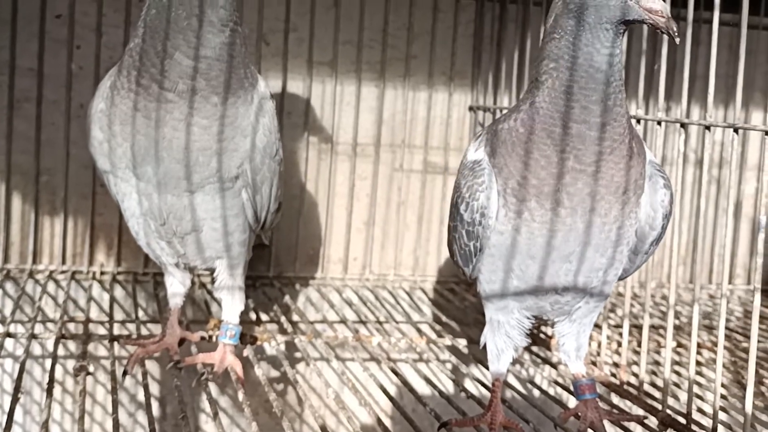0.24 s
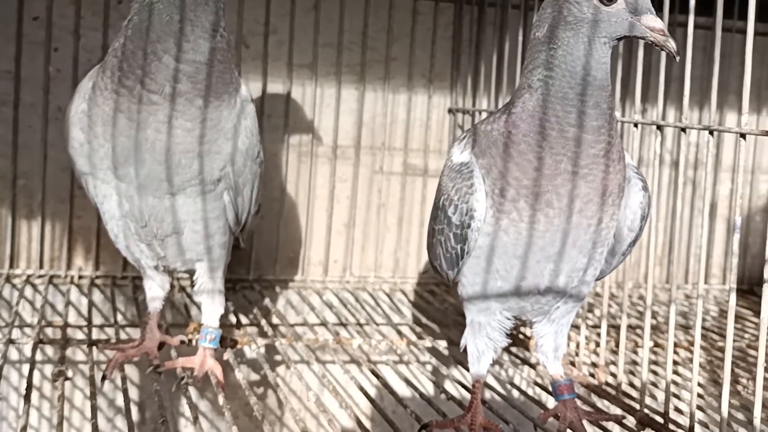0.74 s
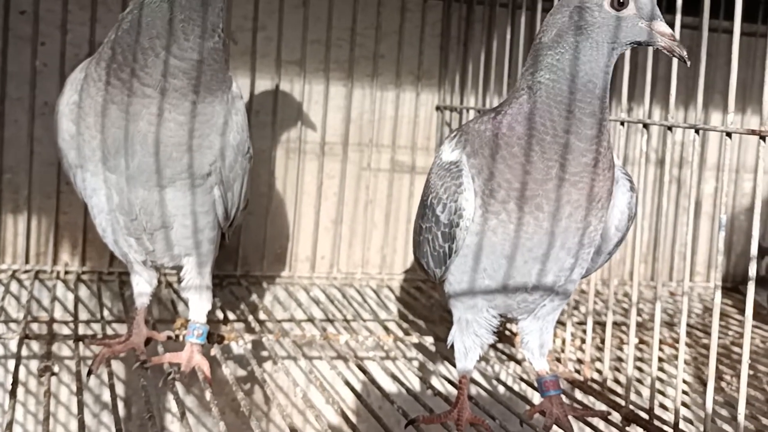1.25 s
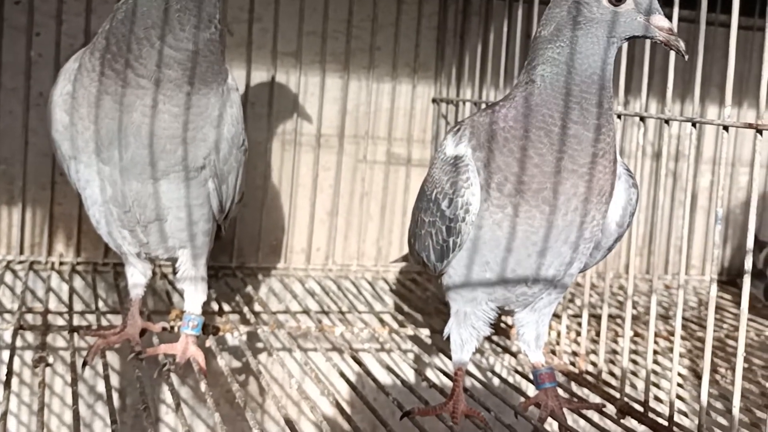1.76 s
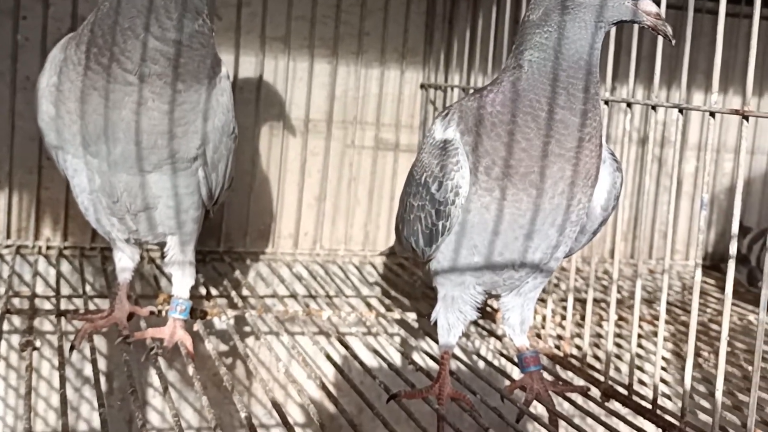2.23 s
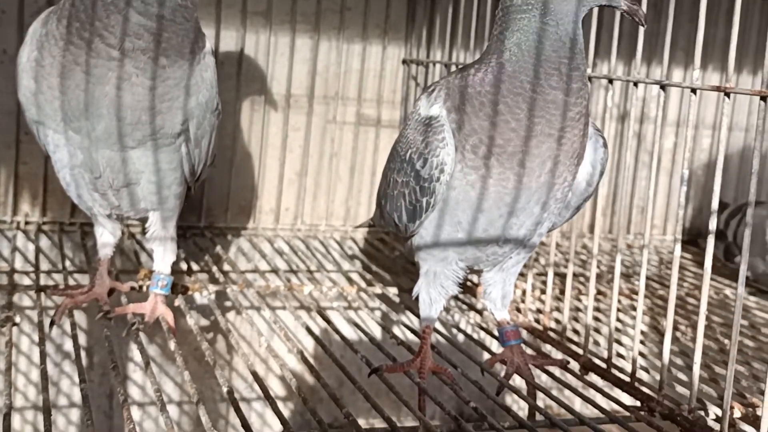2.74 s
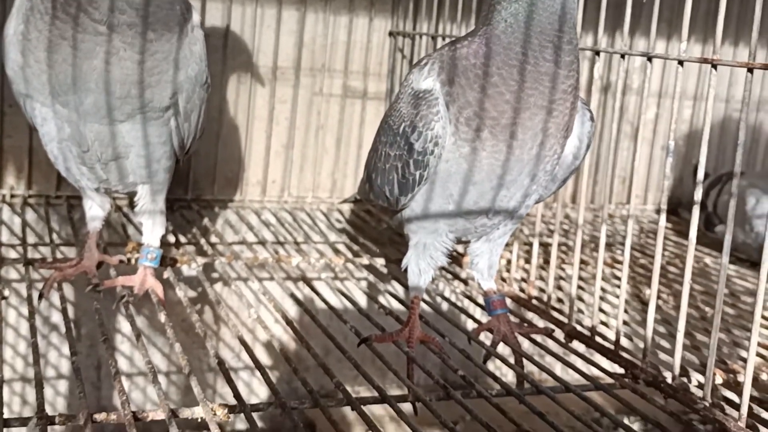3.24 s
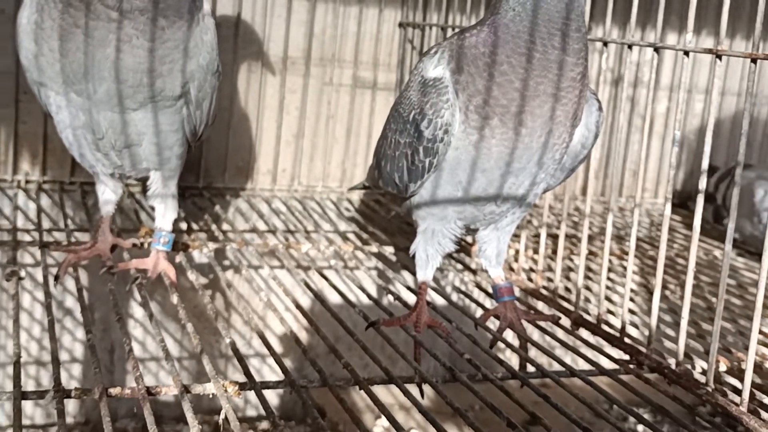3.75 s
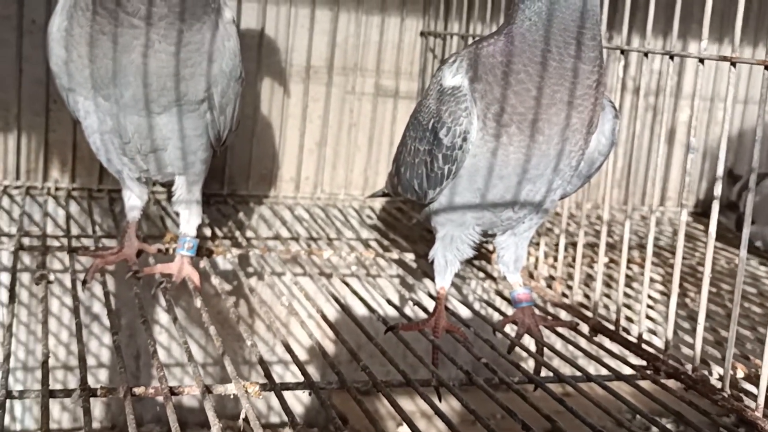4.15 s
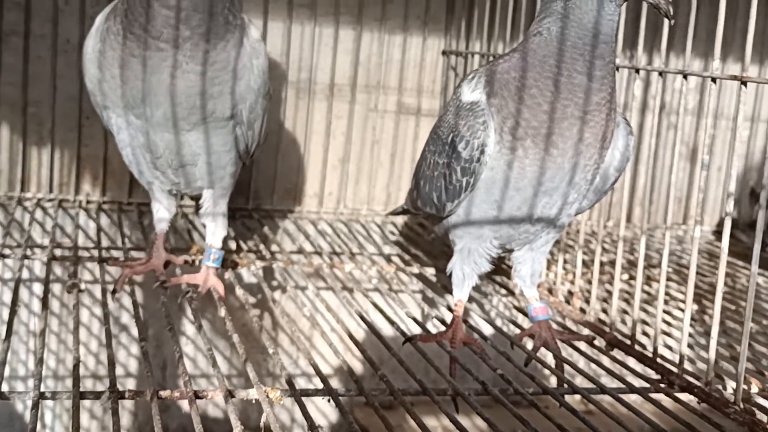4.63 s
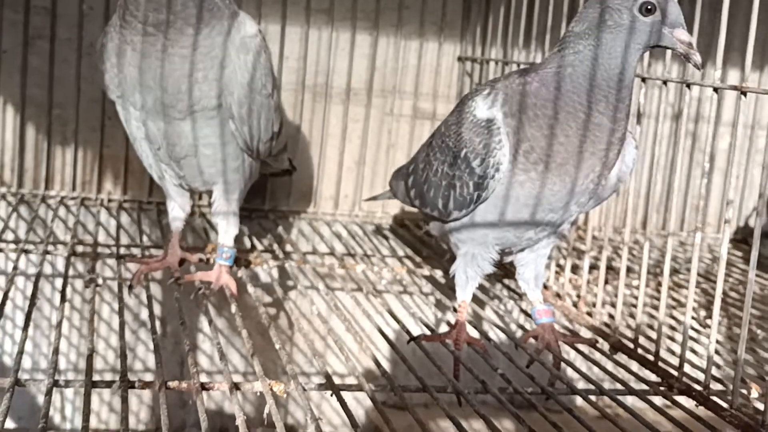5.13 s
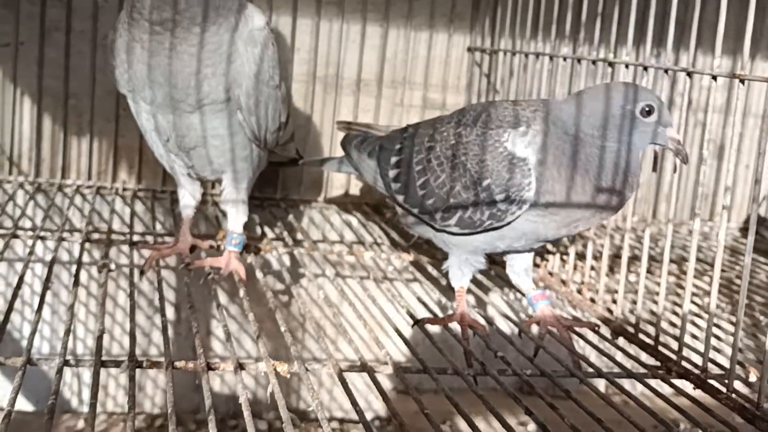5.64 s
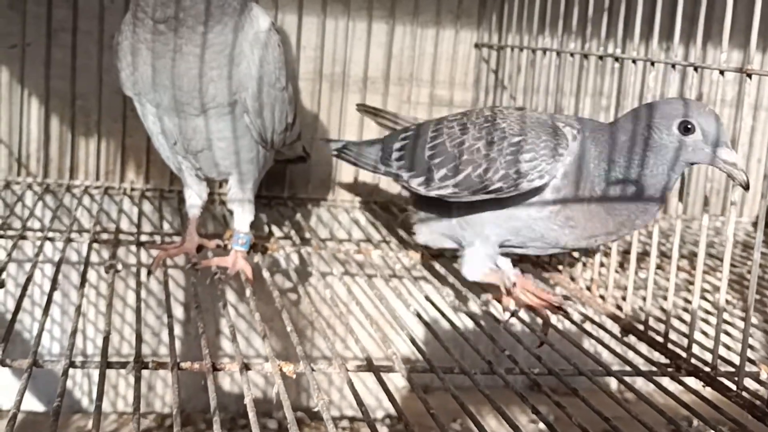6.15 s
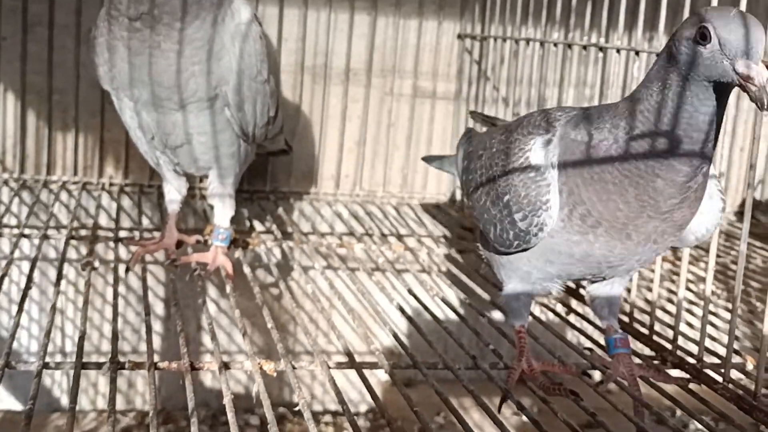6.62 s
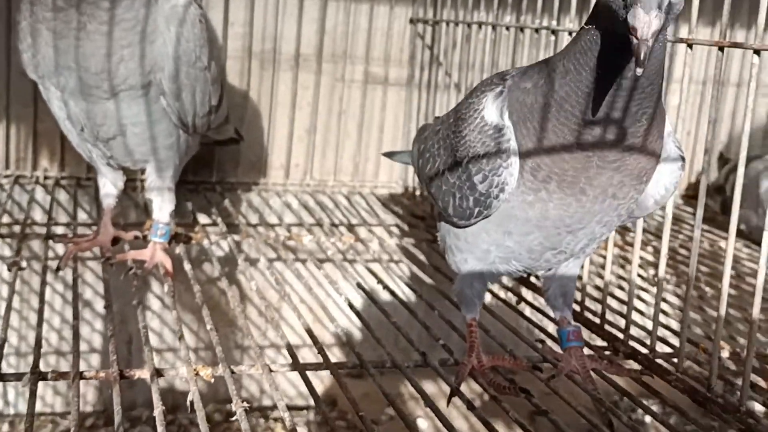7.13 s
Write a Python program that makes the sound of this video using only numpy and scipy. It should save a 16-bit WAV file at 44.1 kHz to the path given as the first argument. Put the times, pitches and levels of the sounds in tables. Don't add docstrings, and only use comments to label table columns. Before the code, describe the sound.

Close stereo microphones in a pigeon loft, with low distant street rumble, faint hiss and a blurred murmur of cooing. From 0 s a vigorous flurry fills the foreground: sharp wing claps, broad feather swishes, dry quill snaps, low puffs of air, thumps and knocks on the cage, and wires pinging briefly around 0.3-0.7 s. It thins after 1.2 s, with short coo notes and thin whistles appearing near 1 s. Around 1.9-2.8 s young birds give hoarse high squeaks and squeals over small steps and rustles. From about 3 to 5.2 s soft throbbing coos return among isolated wing flicks and a few more squeaks. A second, shorter flurry breaks out at 5.2-5.6 s, with claps, gusts and dull landings. Afterwards only light rustling and scattered crisp flicks remain, and a faint raspy squeal rises near 7 s before the end at about 7.4 s.

```python
import sys
import numpy as np
from scipy import signal
from scipy.fft import rfft, irfft
from scipy.io import wavfile
from scipy.ndimage import uniform_filter1d

SR = 44100
rng = np.random.default_rng(int(sys.argv[2]) if len(sys.argv) > 2 else 0)


def wav_out(sig):
    wavfile.write(sys.argv[1], SR, np.round(np.clip(np.atleast_2d(sig).T, -1, 1) * 32767).astype(np.int16))


def elevation(decibels):
    levels = np.asarray(decibels, float)
    return 10 ** (levels / 20)


N = 325458
T = np.arange(N) / SR
HZ = np.arange(N // 2 + 1) * SR / N + 1e-3

# f/Hz, level/dB per Hz
LOFT_COLOUR = [(15, -16), (25, -1.5), (59, 1), (112, -10.5), (184, -1.5), (406, -14.5), (876, -22.5),
               (996, -16), (2000, -42), (2600, -66), (4400, -120)]
HISS_COLOUR = [(1500, -13), (2000, -13), (2500, -5.5), (4000, -1.5), (5000, -8.5), (6200, 4), (7500, -13),
               (8700, 3.5), (9800, -10), (12000, -17), (14500, -18), (16000, -20)]
FLOCK_COLOUR = [(400, -8.0), (480, -6.0), (540, -2.0), (600, -10.0), (680, -13.5)]
DRAUGHT_COLOUR = [(12, -34), (25, -1.5), (60, 0.5), (90, 1.5), (140, -32)]
GUST_COLOUR = [(12, -42), (22, -4), (33, 3), (50, -7), (80, -19), (130, -31)]
FEATHER_COLOUR = [(530, -58), (900, -8), (1190, -8.5), (1670, -11), (2810, -1), (3930, 1), (5000, -3.5),
                  (5720, -2), (9000, -11.5), (11700, -58), (19800, -120)]
SHEEN_COLOUR = [(3530, -13.5), (6000, -1.5), (9880, -0.5), (10800, -1), (13200, -2.5), (15600, -5),
                (16000, -41), (16300, -45)]
BODY_COLOUR = [(53, -43), (90, -15.5), (139, -2), (178, 2), (344, -9), (539, -2), (698, -10), (833, -9.5),
               (926, -11.5), (1240, -13), (1500, -15.5), (1950, -30.5), (3300, -120)]
QUILL_COLOUR = [(2000, -34), (4000, -15), (7500, 3.5), (11000, 2.5), (14500, -2), (16400, -1), (16600, -50)]

# t/s, level/dB
FLOCK_LEVEL = [(0, -49), (.47, -45.5), (1.0, -51), (1.5, -59.5), (2.5, -66.5), (3.0, -58.5), (3.5, -60.5),
               (4.07, -56.5), (4.8, -57), (5.3, -72), (5.7, -60), (6.15, -70), (6.45, -62.5), (7.38, -69)]
# t/s, level/dB
DRAUGHT_LEVEL = [
    (0, -57.5),
    (1.3, -57),
    (2.0, -57.5),
    (2.6, -61.5),
    (3.2, -57.5),
    (3.8, -63.5),
    (4.4, -67),
    (5.6, -71),
    (6.5, -68),
    (7.38, -66),
]
# t/s, peak level/dB
GUSTS = [(.02, -44.5), (.11, -46), (.215, -33.5), (.325, -29.5), (.435, -35), (.545, -32.5), (.655, -28.5),
         (.75, -30), (.86, -41), (.97, -49), (1.1, -47), (1.22, -39), (5.21, -35.5), (5.285, -41),
         (5.41, -40), (5.49, -38), (5.63, -46)]
# t/s, feather level/dB, floor-shaking feet level/dB
BUSTLE = [(0, -44, -45.5), (.15, -45, -51), (.4, -36, -39.5), (.65, -44, -40.5), (1.15, -44, -48),
          (1.5, -48, -51), (1.8, -52, -57), (2.3, -51, -55.5), (2.85, -57.5, -58.5), (3.5, -58.5, -58),
          (3.75, -50, -47.5), (4.2, -52.5, -53.5), (4.6, -45.5, -50.5), (4.95, -51, -49.5), (5.4, -42, -41),
          (5.65, -48.5, -49.5), (6.5, -49.5, -55.5), (7.38, -54.5, -64.5)]
# t/s, peak level/dB, sheen above 7 kHz level/dB, body under 1 kHz level/dB
FLURRY = [(0.0494, -22.5, -2, -3.5), (0.1484, -31, 3, -13), (0.167, -22, -3, -7), (0.216, -27.5, -1, -21),
          (0.258, -32.5, 2, -1), (.3475, -35, 5.5, -1), (0.502, -15.5, -2.5, -6.5), (0.553, -33, 3, -24),
          (.6194, -29, -8, 0), (0.284, -28, -2, -2.5), (0.506, -28, -11, -10), (0.6555, -40, -6, -12),
          (.4414, -38, 2, -20), (0.859, -32.5, -0.5, -13), (0.953, -26, -1.5, -4), (0.979, -27, 2.5, -21),
          (1.1544, -39, 4, -32), (1.175, -39, -3, -14), (1.2062, -29.5, 1, -5), (1.3433, -40, -0.5, 1),
          (1.384, -36, 3, -6), (1.437, -43, 9.5, -21), (1.487, -32, -4, -5), (1.5494, -53, 7, -11),
          (1.638, -33, -4, -3), (1.6994, -44, -3, -14), (1.7945, -34.5, -4, -10), (1.856, -38, -2, -8),
          (1.923, -37.5, -0.5, -9), (2.027, -47, 6, -2)]
# t/s, peak level/dB, sheen level/dB, body level/dB
FLICKS = [(2.297, -49.5, 2, -1), (2.406, -38, 4.5, -9), (2.467, -43, -2, -0.5), (2.761, -44.5, 1.5, -19),
          (3.085, -39.5, 3.5, -27), (3.356, -38.5, -3, -12), (3.6064, -39.5, -2.5, -24),
          (3.799, -35.5, -3, -14), (3.9699, -43, -6, -15), (4.076, -41, 1.5, -6), (4.436, -59, 13, -1),
          (4.788, -34, -6, -25), (3.855, -42.5, -3, -12), (4.595, -53, 8, -12), (5.111, -40.5, 2.5, -10),
          (5.065, -36, -5, 0.5), (5.172, -48, -6, -4), (4.9715, -46, 0, -8), (5.396, -29.5, -4, -10),
          (5.2586, -28, -4, -7), (5.3448, -38, -2, -11), (5.368, -25.5, -6.5, -5.5), (5.468, -28, 5, -6),
          (5.478, -29.5, 2, -11), (5.587, -36.5, -3, 2), (5.729, -40.5, 3, -16), (6.0455, -38, 8.5, -29),
          (6.348, -34.5, 0, -4.5), (6.568, -40.5, -3, -8), (6.643, -34, 7, -7), (6.796, -47.5, 12.5, 2.5)]
# crest t/s, peak level/dB, sheen level/dB, body level/dB, rise/s
SWISHES = [(0.043, -23, -5, -21, 0.0018), (0.44, -28, -1.5, -20, 0.0066), (0.603, -28.5, 1, -9, 0.0047),
           (0.652, -15, -1.1, -17, 0.0018), (0.768, -31, -2, 0, 0.012), (3.64, -40, -5, -32, 0.011),
           (4.328, -40, 6.5, -20, 0.0057), (4.347, -40.5, 7, -22, 0.0029), (4.482, -42.5, -2, -10, 0.01),
           (4.98, -41, -0.5, -1, 0.0055), (5.2, -36.5, -2, 0.5, 0.0078), (5.281, -32.5, -3, -5, 0.0031),
           (5.409, -28, -2, -2, 0.0062), (5.491, -34, 1, -3.5, 0.0086), (5.776, -35, -5.5, -6, 0.0081),
           (1.08, -25, 0.5, -3.5, 0.0016), (6.499, -32.5, 5.5, -15.5, 0.003), (6.3, -60, 14, -23, 0.02),
           (7.01, -46, -1, -30, 0.012)]
# t/s, peak level/dB, fall/s
SNAPS = [(0.049, -19, 0.002), (0.1496, -22, 0.002), (0.167, -18, 0.002), (0.2179, -21, 0.002),
         (0.2603, -30, 0.002), (0.3485, -27, 0.002), (0.4414, -22, 0.002), (0.5015, -14, 0.002),
         (0.6, -26, 0.002), (0.6484, -12, 0.0022), (0.7669, -26, 0.002), (0.804, -27, 0.0022),
         (0.9514, -26, 0.002), (0.9787, -25, 0.002), (1.0782, -14, 0.002), (1.1543, -28, 0.002),
         (1.176, -27, 0.0023), (1.2085, -23, 0.002), (1.3433, -34, 0.002), (1.3833, -27, 0.002),
         (1.4376, -29, 0.002), (1.6387, -34, 0.002), (1.7948, -35, 0.002), (1.8534, -32, 0.002),
         (1.8585, -26, 0.002), (1.924, -35, 0.002), (2.0257, -35, 0.002), (2.408, -27, 0.002),
         (2.7591, -43, 0.002), (3.0844, -29, 0.002), (3.3543, -34, 0.002), (3.6042, -37, 0.002),
         (3.7958, -37, 0.002), (4.0761, -35, 0.002), (4.3241, -25, 0.002), (4.4368, -29, 0.0022),
         (4.788, -37, 0.002), (5.1696, -40, 0.002), (5.2584, -30, 0.002), (5.3448, -32, 0.002),
         (5.3687, -28, 0.002), (5.3991, -24, 0.002), (5.469, -17, 0.002), (5.5474, -31, 0.002),
         (5.5862, -35, 0.002), (5.732, -33, 0.002), (6.0447, -27, 0.002), (6.348, -36, 0.0017),
         (6.4971, -29, 0.0018), (6.6435, -24, 0.002), (6.7955, -35, 0.002)]
# t/s, peak level/dB, f/Hz, ring/s
THUDS = [
    (0.162, -40, 172, 0.077),
    (0.275, -33, 154, 0.047),
    (0.501, -29, 175, 0.1),
    (0.595, -29.5, 154, 0.065),
    (1.068, -44, 181, 0.047),
    (5.194, -33, 230, 0.094),
    (5.278, -29.5, 243, 0.064),
    (5.391, -32, 191, 0.1),
    (5.496, -25, 136, 0.082),
]
# t/s, peak level/dB, f/Hz, ring/s
KNOCKS = [
    (.299, -18, 553, 0.01),
    (0.847, -25, 390, 0.022),
    (.884, -40, 504, .03),
    (2.084, -31, 398, 0.013),
    (2.229, -40, 393, 0.03),
    (2.339, -34.5, 420, 0.022),
    (2.452, -38.5, 444, .02),
    (2.803, -31, 424, 0.022),
    (4.801, -34.5, 534, 0.028),
]
# t/s, peak level/dB, f/Hz, ring/s
PINGS = [
    (0.309, -32, 740, 0.087),
    (0.416, -33.5, 830, 0.18),
    (0.627, -29.5, 834, 0.11),
    (0.715, -30.5, 691, 0.085),
]
# t/s, length/s, f/Hz, glide/Hz, level/dB
WHISTLES = [(0.972, 0.15, 2940, 2, -49.5), (1.159, 0.089, 2880, 60, -52), (1.18, 0.27, 3330, 30, -54),
            (1.376, 0.073, 3390, -3, -59), (1.536, 0.25, 2800, 8, -55), (1.8, 0.12, 3320, 0, -57),
            (2.232, 0.067, 2640, 0, -55), (2.3, 0.12, 2550, 0, -56), (3.115, .07, 3410, 0, -58),
            (3.191, 0.22, 3370, -17, -58.5), (3.36, 0.1, 3360, 0, -62), (2.98, .08, 2400, -3, -62),
            (6.825, 0.085, 2450, 450, -59)]
# t/s, length/s, f/Hz, glide/Hz, level/dB
SQUEAKS = [(1.9, 0.067, 3430, -100, -50), (1.865, 0.042, 2750, 500, -51), (1.9, .09, 3080, -120, -47.5),
           (1.959, 0.08, 2974, -200, -48.5), (1.934, 0.1, 2650, -120, -49), (2.07, 0.19, 2710, -42, -55.5),
           (2.187, 0.036, 2960, 350, -49), (2.204, 0.059, 3160, 40, -49), (2.186, 0.043, 2750, 60, -55),
           (2.326, 0.14, 3330, 14, -53), (2.34, 0.055, 4200, 40, -50), (2.381, 0.071, 3990, 150, -47.5),
           (2.411, 0.056, 3000, 150, -54), (2.422, 0.12, 2600, -60, -57.5), (2.56, 0.11, 2560, -56, -57.5),
           (2.701, 0.1, 2500, 0, -61), (2.829, 0.13, 2430, -34, -60), (2.779, .05, 3900, 0, -58),
           (3.156, 0.068, 3410, -35, -50.5), (3.63, 0.06, 3370, -60, -45.5), (3.779, 0.078, 3330, -7, -51),
           (3.805, 0.09, 3200, 2, -55), (3.963, 0.042, 3380, 0, -51), (5.906, 0.096, 3450, -2, -54.5)]
# t/s, length/s, f/Hz, glide/Hz, level/dB
SQUEALS = [
    (1.869, 0.22, 2936, -300, -50.5),
    (2.313, 0.162, 3920, -100, -51),
    (3.156, 0.055, 3900, 0, -55),
    (3.965, 0.068, 3920, -2, -50.5),
    (6.951, 0.39, 3350, 306, -57.5),
    (7.04, 0.14, 4020, -150, -54.5),
]
# t/s, length/s, f/Hz, fundamental level/dB, octave level/dB
COO = [(0.984, 0.042, 524, -41.5, -67), (1.157, 0.038, 532, -44.5, -80), (1.221, .035, 552, -44.5, -72),
       (2.85, 0.35, 522, -69, -91), (3.121, 0.098, 540, -56.5, -85), (3.19, 0.15, 488, -62, -62.5),
       (3.3, 0.15, 478, -54.5, -59), (3.39, 0.061, 480, -59, -61), (3.472, 0.11, 508, -50.5, -70),
       (3.54, 0.34, 511, -57.5, -80), (3.679, 0.072, 468, -57, -57), (3.728, 0.062, 482, -51.5, -60),
       (3.95, 0.067, 537, -71, -56), (4.031, 0.088, 542, -67, -52), (4.145, 0.063, 542, -65, -52),
       (4.246, 0.055, 530, -51, -55), (4.407, 0.067, 546, -57, -62), (4.53, 0.05, 510, -60, -59),
       (4.582, 0.031, 526, -55, -57), (4.8, 0.083, 518, -61, -57.5), (4.496, 0.057, 537, -78, -55),
       (4.66, 0.094, 542, -48.5, -53.5), (4.71, 0.072, 522, -63, -62), (4.899, 0.06, 471, -45, -52.5),
       (4.99, 0.095, 493, -52, -68), (5.029, 0.043, 503, -52, -59), (5.15, 0.11, 499, -50, -68)]

LOFT_DB, HISS_DB, HISS_LEFT_DB = -55.5, -55.5, 5
GUST_S = 0.025
CLAP_LATE_S, CLAP_HOLD_S = 0.00146, 0.0015
CLAP_RISE_S, CLAP_FALL_S = 0.0013, 0.0062
LOUD_DB, QUICKER_PER_DB = -24.5, 0.02
SHEEN_FALL_SHARE = 0.91
SWISH_FALL_SHARE = 1.9
LOFT_TAIL_DB, LOFT_TAIL_S = -26.5, 0.022
SHEEN_DB, SHEEN_SLOPE = -54, 0.72
SNAP_RISE_S, SNAP_DB = 0.0002, -3
SQUEAK_HOARSE_HZ, SQUEAL_HOARSE_HZ, WHISTLE_HOARSE_HZ = 230, 603, 65.3
COO_SAG_HZ = -13
ECHO_DB, ECHO_S = -13, 0.04


def colour(x, table):
    hz, db = np.transpose(table)
    gain = elevation(np.interp(np.log(HZ), np.log(hz), db, -99, -99))
    y = irfft(rfft(x) * gain, N)
    return y / np.sqrt(np.mean(y ** 2))


def smooth(x, size, axis=-1):
    return uniform_filter1d(uniform_filter1d(x, size, axis), size, axis)


def walk(rate_hz):
    k = int(SR / rate_hz)
    steps = np.repeat(rng.standard_normal(N // k + 1), k)
    return 1.72 * smooth(steps, k)[:N]


def grains(spread_db):
    size = elevation(spread_db * rng.exponential(size=N // 8 + 1))
    return rng.standard_normal(N) * np.repeat(size, 8)[:N]


def field(table, spread_db, like_hz, direct, lag_s):
    same = direct + (1 - direct) / (1 + (HZ / like_hz) ** 2)
    shared, left, right = (rfft(grains(spread_db)) for _ in range(3))
    late = shared * np.exp(-2j * np.pi * HZ * lag_s)
    pair = np.sqrt(same) * np.array([late, shared]) + np.sqrt(1 - same) * np.array([left, right])
    return colour(irfft(pair, N), table)


def curve(table, column):
    rows = np.array(table)
    return np.interp(T, rows[:, 0], rows[:, column])


def place(x, lag_s, pan_db):
    left = np.roll(x, int(lag_s * SR))
    return np.array([left * elevation(pan_db / 2), x * elevation(-pan_db / 2)])


def patchy(x, depth_db, bins, frames):
    _, _, z = signal.stft(x, nperseg=512)
    chance = uniform_filter1d(rng.standard_normal(z.shape[1:]), bins, axis=0)
    chance = uniform_filter1d(chance, frames, axis=1)
    gain = elevation(depth_db * chance / chance.std())
    gain = gain / np.sqrt(np.mean(gain ** 2))
    return signal.istft(z * gain, nperseg=512)[1][:, :N]


def note(s, length, hz, glide_hz, blur, blur_hz, arch=0.71):
    t = T[:int(length * SR)]
    k = int(SR / blur_hz)
    noise = rng.standard_normal((2, SR))[:, :len(t) + 2 * k]
    fuzz = smooth(noise, k)[:, :len(t)] * np.sqrt(0.29 * k)
    phase = 2 * np.pi * (hz * t + glide_hz * (t ** 2 / length - t) / 2)
    rough = 1 - blur + blur * (fuzz[0] + 1j * fuzz[1])
    wave = np.imag(rough * np.exp(1j * phase))
    out = np.zeros(N)
    start = int(s * SR)
    out[start:start + len(t)] = 2 * np.sin(np.pi * t / length) ** arch * wave
    return out


def loft():
    lean_db = np.array([[HISS_LEFT_DB], [-HISS_LEFT_DB]]) / 2
    hiss = elevation(HISS_DB + 0.11 * walk(3.9) + lean_db) * field(HISS_COLOUR, 0, 600, 0.034, 0.000273)
    rumble = elevation(LOFT_DB + 0.68 * walk(2.535)) * field(LOFT_COLOUR, 0, 380, 0.28, -0.00026)
    return rumble + hiss


def flock():
    level = elevation(curve(FLOCK_LEVEL, 1) + 0.86 * walk(12))
    return level * field(FLOCK_COLOUR, 0, 610, 0.17, -0.000028)


def air():
    puffs = sum(elevation(db) * np.exp(-((T - s) / GUST_S) ** 2 / 2) for s, db in GUSTS)
    gusts = puffs * field(GUST_COLOUR, 0, 800, 0.31, 0)
    return gusts + elevation(curve(DRAUGHT_LEVEL, 1)) * field(DRAUGHT_COLOUR, 0, 900, 0.44, 0)


def strokes():
    power = np.zeros((3, N))
    moves = []
    for s, db, sheen_db, body_db in FLURRY + FLICKS:
        rise = CLAP_RISE_S * (0.5 + QUICKER_PER_DB * (LOUD_DB - db))
        moves.append((s + CLAP_LATE_S, db, sheen_db, body_db, rise, CLAP_FALL_S))
    moves += [(*row, SWISH_FALL_SHARE * row[-1]) for row in SWISHES]
    for s, db, sheen_db, body_db, rise, fall in moves:
        span = slice(max(int((s - 10 * rise) * SR), 0), int(s * SR) + SR // 5)
        t = T[span] - s
        t = t - np.clip(t, 0, CLAP_HOLD_S)
        fall = fall * np.array([[1], [SHEEN_FALL_SHARE], [1]])
        decay = np.exp(-t / fall) + elevation(LOFT_TAIL_DB) * np.exp(-t / LOFT_TAIL_S)
        shape = decay / (1 + np.exp(-t / rise - t / fall * (t < 0)))
        peak_db = db - 3.5 + np.array([[0], [sheen_db], [body_db]])
        power[:, span] += elevation(2 * peak_db) * shape / shape.max(axis=1, keepdims=True)
    return power


def wings():
    flutter = 1.1 * walk(25)
    stir = curve(BUSTLE, 1)
    sheen_stir = SHEEN_DB + SHEEN_SLOPE * (stir + 50)
    feet = curve(BUSTLE, 2) + 1.12 * walk(15)
    rustle = elevation(2 * np.array([stir + flutter, sheen_stir + flutter, feet]))
    still = elevation(2 * np.array([[-57.5], [-60], [-58]]))
    power = strokes() + np.maximum(rustle - still, 0.25 * still)
    lean = elevation(np.array([[-1.5, -2.0], [3.5, -1.5], [-2.0, -2.0]]))[..., None]
    feather, sheen, body = lean * np.sqrt(power)[:, None]
    out = feather * field(FEATHER_COLOUR, 0.96, 1800, 0.02, -0.0004)
    out += sheen * field(SHEEN_COLOUR, 1.7, 700, 0.22, -0.000363)
    return out + body * field(BODY_COLOUR, 0.79, 710, 0.52, -0.00025)


def snaps():
    size = np.zeros(N)
    for s, db, fall in SNAPS:
        span = slice(int(s * SR) - 100, int(s * SR) + 1500)
        t = T[span] - s
        size[span] += elevation(db + SNAP_DB) * np.exp(-t / fall * (t > 0)) / (1 + np.exp(-t / SNAP_RISE_S))
    return size * elevation(np.array([[2.5], [-2.5]])) * field(QUILL_COLOUR, 1.5, 700, 0.37, -0.000367)


def knocks():
    out = np.zeros(N)
    t = T[:SR // 4]
    for s, db, hz, ring in KNOCKS + THUDS + PINGS:
        turn = 2 * np.pi * hz * t
        click = 0.86 * np.sin(1.46 * turn) + 0.5 * np.sin(2.34 * turn)
        modes = -np.sin(turn) - click * np.exp(-t / 0.004)
        shape = (1 - np.exp(-t / 0.0011)) * np.exp(-np.log(1000) * t / ring)
        i = int(s * SR)
        out[i:i + len(t)] += elevation(db) * modes * shape
    return place(out, -0.00037, 2.7)


def squeaks():
    calls = [(*row, 0.92, SQUEAK_HOARSE_HZ) for row in SQUEAKS]
    calls += [(*row, 0.95, SQUEAL_HOARSE_HZ) for row in SQUEALS]
    calls += [(*row, 0.75, WHISTLE_HOARSE_HZ) for row in WHISTLES]
    sides = []
    for side_db in (1.5, -1.5):
        voice = sum(elevation(db) * note(s, length, hz, glide, blur, hoarse, arch=0.18)
                    for s, length, hz, glide, db, blur, hoarse in calls)
        sides.append(elevation(side_db) * voice)
    return np.array(sides)


def coo():
    voice = np.zeros(N)
    for s, length, hz, db, octave_db in COO:
        voice += elevation(db) * note(s, length, hz, COO_SAG_HZ, 0.32, 32)
        voice += elevation(octave_db) * note(s, length, 2 * hz, 2 * COO_SAG_HZ, 0.48, 60)
    return place(voice, -1e-4, -2.4)


def echo(x):
    tail = rng.standard_normal((2, N)) * np.exp(-T / ECHO_S) * np.sqrt(2 / (ECHO_S * SR))
    return x + elevation(ECHO_DB) * irfft(rfft(x) * rfft(tail), N)


def scene():
    far = patchy(loft(), 1.75, bins=2, frames=12) + flock()
    flurries = air() + patchy(wings(), 2.3, bins=4, frames=8) + snaps() + knocks()
    return far + flurries + echo(squeaks() + coo())


def roll_off(x):
    return signal.sosfilt(signal.butter(12, 16480, fs=SR, output="sos"), x)


def record(dry):
    top = 1 / np.sqrt(1 + (HZ / 15100) ** 60)
    mix = irfft(rfft(dry) * top, N)
    return roll_off(mix)


dry = scene()
out = record(dry)
wav_out(out)
```